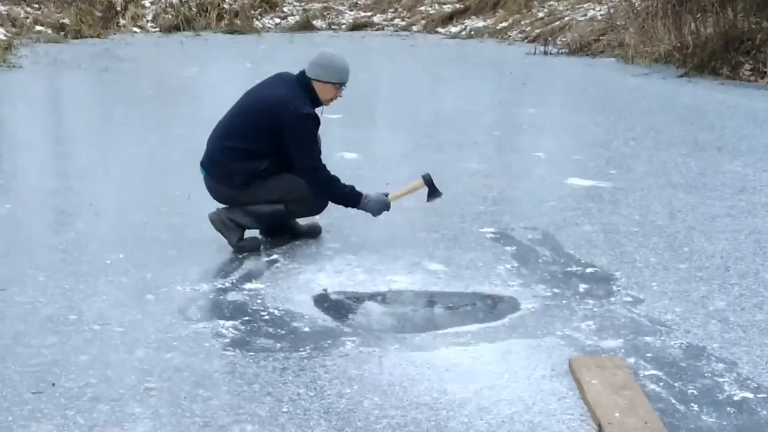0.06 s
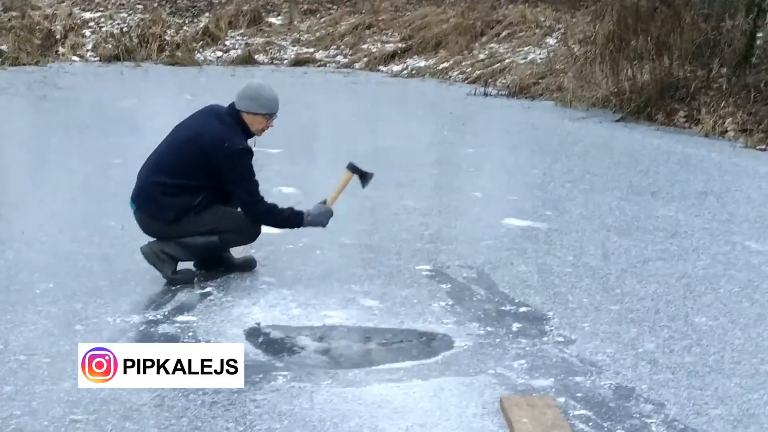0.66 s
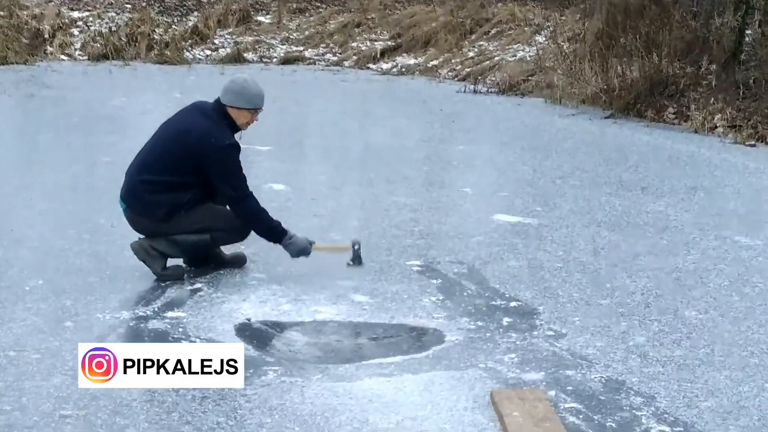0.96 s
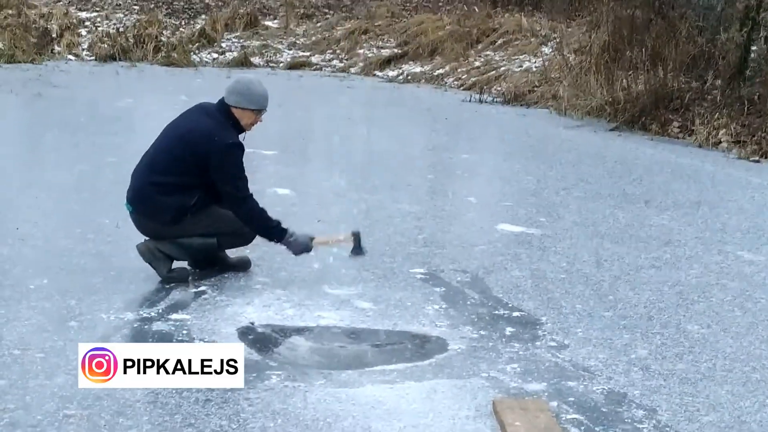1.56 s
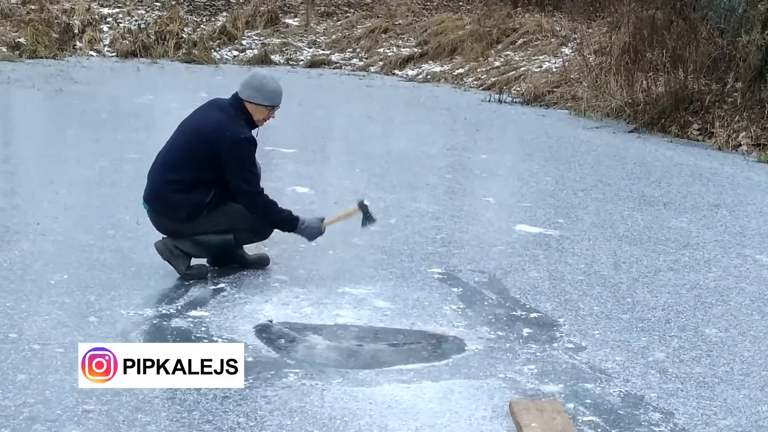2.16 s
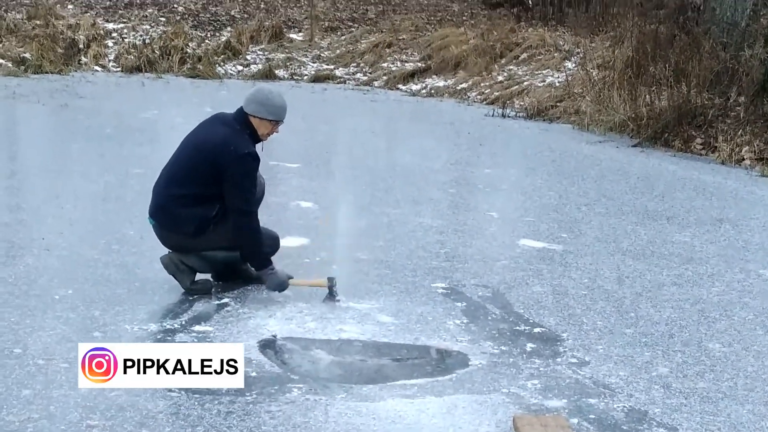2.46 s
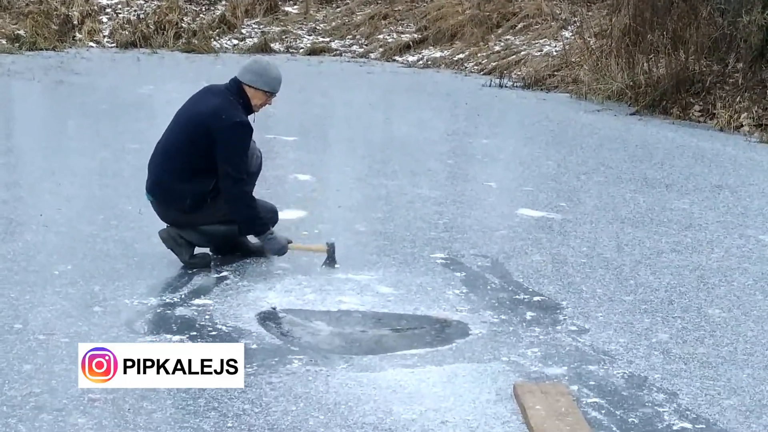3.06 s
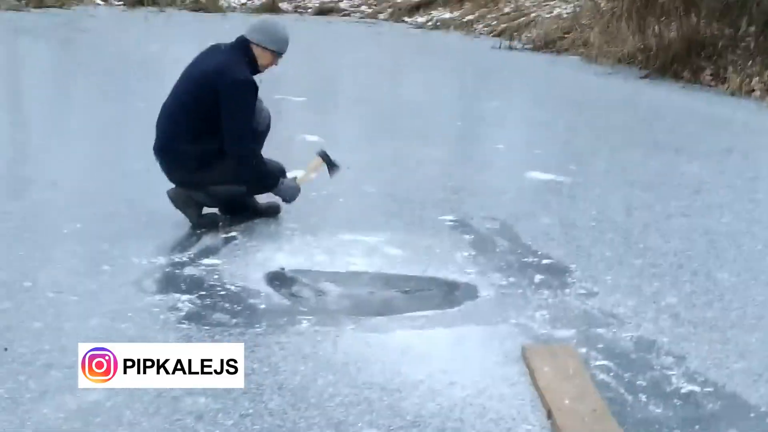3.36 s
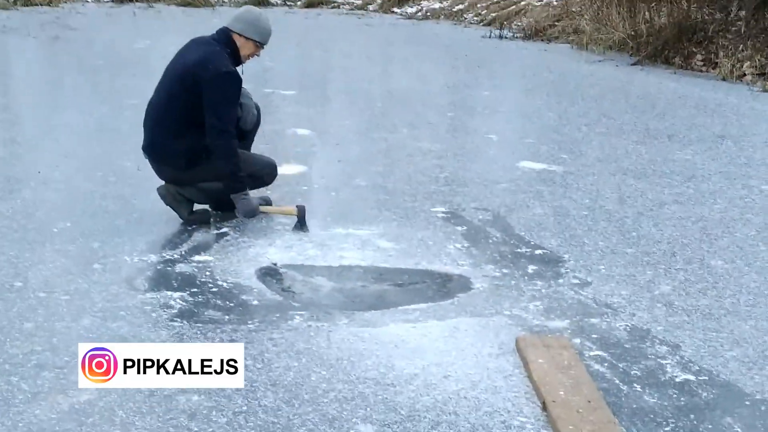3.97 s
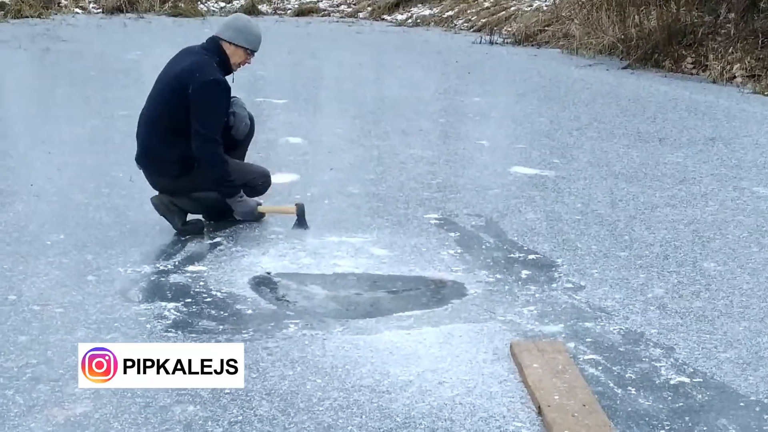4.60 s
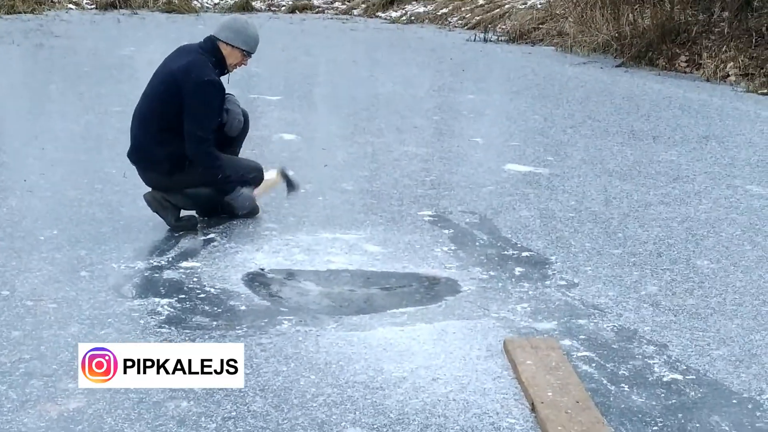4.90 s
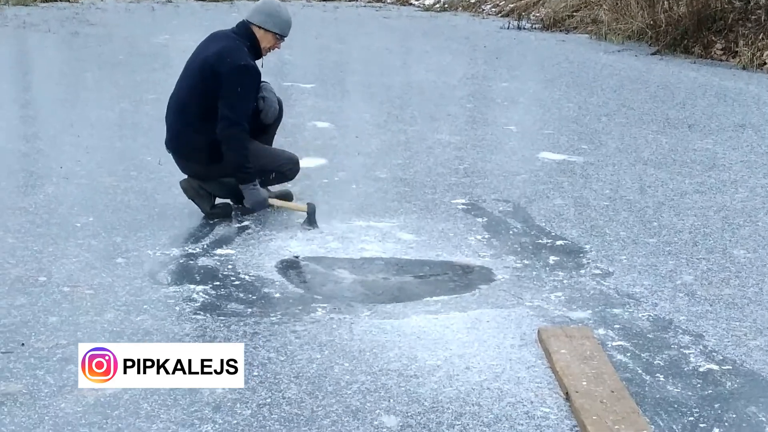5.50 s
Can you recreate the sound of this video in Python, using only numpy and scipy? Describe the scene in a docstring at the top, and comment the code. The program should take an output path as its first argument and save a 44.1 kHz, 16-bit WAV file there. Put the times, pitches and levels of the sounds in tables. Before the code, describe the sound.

Steady hatchet blows crack and crunch into a frozen pond, with quick chirps through the ice, pattering splinters and a light breeze.

```python
"""On a frozen pond, a few metres away, a small hatchet chops a notch in thick ice about twice a second.
Each blow sends a falling chirp through the ice, which arrives just before the crack and thud in the air.
As the notch deepens, the thud fades and the crunch tends to last longer. Chips spray, skid and drop off
the lifted blade, and the reedy banks echo. A faint hiss leads up to the first blow, and a breeze with
a few gusts buffets the microphone over a distant hush."""
import sys
import numpy as np
from scipy import signal
from scipy.fft import rfft, irfft, next_fast_len
from scipy.io import wavfile
from scipy.ndimage import uniform_filter1d, map_coordinates

SR = 44100
rng = np.random.default_rng(int(sys.argv[2]) if len(sys.argv) > 2 else 0)


def inscribe(sig):
    """Save sig as 16-bit PCM at rate SR to the path in sys.argv[1].

    A 1-D sig is mono; a 2-D sig holds one channel per row.
    Samples are clipped to [-1, 1] before scaling.
    """
    pcm = np.round(np.clip(np.atleast_2d(sig).T, -1, 1) * 32767)
    wavfile.write(sys.argv[1], SR, pcm.astype(np.int16))


N = 248724
T = np.arange(SR // 4) / SR  # seconds within one short sound

# Hatchet blows: start_s, crack_db, crunch_s, notch_hz, notch_boost_db, hiss_boost_db, wave_db, wave_hz
BLOWS = [ (0.258, -18, 0.0011, 1550, 8.5, 12, -30.5, 744),
         (0.7968, -17, 0.0037, 1550, 6.5, 4.5, -25.5, 662),
         (1.3483, -13.5, 0.00054, 2160, 13.5, -2, -25.5, 853),
         (1.8806, -17, 0.0035, 1840, 13.5, 2.5, -28, 714), (2.3971, -17, 0.0037, 4050, 6, 2, -29, 715),
         (2.9051, -17, 0.0027, 3400, 6.5, 6, -25.5, 684), (3.406, -16.5, 0.0043, 2850, 5, -1.5, -28.5, 685),
         (3.899, -17.5, 0.0031, 1080, 13.5, -12.5, -25.5, 713),
         (4.4193, -16, 0.0047, 4090, 10, -0.5, -39.5, 674),
         (4.9214, -17.5, 0.0049, 3500, 5.5, 5.5, -31, 677), (5.427, -19.5, 0.0093, 2900, 4, -1, -33.5, 580)]


def amp(db):
    """Turn decibels into a number to multiply by."""
    return 10 ** (np.asarray(db) / 20)


def unit(x):
    """Scale a sound to an average (rms) level of 1."""
    return x / np.sqrt(np.mean(x ** 2) + 1e-20)


def burst(x):
    """Scale a short sound to the energy of 10 ms at level 1."""
    return x / np.sqrt(np.sum(x ** 2) * 100 / SR + 1e-20)


def along(points, hz):
    """Read between (pitch_hz, value) points, with octaves evenly spaced."""
    pitches, values = np.transpose(points)
    return np.interp(np.log(hz + 1), np.log(pitches), values)


def add(track, start_s, x):
    """Mix a sound into the track at the given time."""
    start = max(round(start_s * SR), 0)
    part = track[..., start:start + x.shape[-1]]
    part += x[..., :part.shape[-1]]


def filtered(x, response):
    """Multiply each frequency in a sound by response(hz)."""
    size = next_fast_len(x.shape[-1] + SR // 8)
    return irfft(rfft(x, size) * response(np.fft.rfftfreq(size, 1 / SR)), size)[..., :x.shape[-1]]


def ringing(gain_db, size=4096):
    """The ring after one sharp tap, with the tone colour gain_db(hz)."""
    cepstrum = irfft(np.log(amp(gain_db(np.fft.rfftfreq(size, 1 / SR))) + 1e-6))
    cepstrum[1:size // 2] *= 2  # folded so that nothing sounds before the tap
    cepstrum[size // 2 + 1:] = 0
    return irfft(np.exp(rfft(cepstrum)))


def diffuse(pair, colour):
    """Colour and blend two unrelated noises so they seem to come from all around."""
    # How alike left and right are: pitch_hz, likeness (1 = the same)
    likeness = [(120, 1), (400, 0.76), (1000, 0.29), (2500, 0.094), (6000, 0.055)]
    turn = lambda hz: np.arccos(np.clip(along(likeness, hz), -1, 1)) / 2
    mid, side = filtered(pair, lambda hz: amp(along(colour, hz)) * [np.cos(turn(hz)), np.sin(turn(hz))])
    return np.array([mid + side, mid - side])


def wobble(rate):
    """A smooth curve through `rate` random points a second."""
    return map_coordinates(rng.standard_normal(int(N * rate / SR) + 4), [np.arange(N) * rate / SR])


def from_notch(x):
    """Sound straight from the notch reaches left and right with different timing and level."""
    # How far the left side leads: pitch_hz, lead_radians
    lead = [(150, 0.5), (350, -0.21), (650, -0.86), (900, -0.65), (1300, -0.6), (2800, -1.02), (5500, -1.7),
            (8500, -1.76), (13000, -2)]
    # How much louder the left side is: pitch_hz, level_db
    lean = [(300, 0), (700, .7), (1500, -1), (4500, -2.5), (8000, -1.5), (13000, 1.5)]
    side = lambda hz, share: amp(share * along(lean, hz)) * np.exp(1j * share * along(lead, hz))
    return filtered(x, lambda hz: [side(hz, .5), side(hz, -.5)])


def hush_and_breeze(hush_db=-58, lean_db=3, flutter_db=5.0):
    """A far, steady hush, and wind that buffets each side of the microphone on its own."""
    # Tone colour of the hush: pitch_hz, level_db
    hush_colour = [(60, -21.5), (120, -4), (260, 0.5), (480, -3.5), (790, 2), (1020, 0.5), (1300, -10),
                   (1700, -14.5), (2600, -16.5), (6000, -18.5), (12000, -19), (14000, -17), (15800, -32.5)]
    # Tone colour of the wind: pitch_hz, level_db
    wind_colour = [(10, -10), (25, 8.5), (50, 1), (80, -7.5), (140, -16), (300, -37), (700, -65)]
    # Rise and fall of the breeze: time_s, level_db
    strength = [(0, -52), (1.0, -49), (1.4, -45.5), (2.2, -49.5), (3.3, -54.5), (4.3, -48.5), (4.8, -40),
                (5.64, -40)]
    hush = unit(diffuse(rng.standard_normal((2, N)), hush_colour)) * amp(hush_db + .6 * wobble(2))
    breeze_db = np.interp(np.arange(N) / SR, *np.transpose(strength))
    buffet = unit(filtered(rng.standard_normal((2, N)), lambda hz: amp(along(wind_colour, hz))))
    eddies = np.array([wobble(28), wobble(28)])
    breeze = unit(buffet * amp(flutter_db * eddies)) * amp(breeze_db)
    return hush + breeze * amp([[-lean_db], [lean_db]])


def thin_hiss(peak_db=-59, swell_db_per_s=5, fade_s=0.14):
    """A faint high hiss swells up to the first blow, then dies away."""
    colour = [(1000, -5), (4000, -13), (10000, -12), (15000, -15)]  # pitch_hz, level_db
    noise = unit(diffuse(rng.standard_normal((2, N)), colour))
    t = np.arange(N) / SR - BLOWS[0][0]
    return noise * amp(peak_db + np.minimum(swell_db_per_s * t, -60 * t / fade_s))


def ice_chirp(wave_db, chirp_db, lead_s, pitch_hz, drop_hz=4200, glide_s=.0016, swell_s=0.003):
    """Bending waves in the ice outrun the air, highs first, and settle on the pitch as fast as sound."""
    hz = pitch_hz * (1 + 0.0098 * rng.standard_normal()) + drop_hz * np.exp(-T / glide_s)
    tone = np.sin(2 * np.pi * (np.cumsum(hz) / SR + rng.random()))
    front = np.exp(-((T - .002) / .0012) ** 2)
    swell = np.exp(np.minimum((T - lead_s) / swell_s, (lead_s - T) / 0.001))
    # Flaws in the ice scatter the highs into a short rasp: pitch_hz, level_db
    colour = [(300, -3.5), (2000, 4.0), (4000, -2), (7000, -8), (15000, -18.0)]
    rasp = filtered(rng.standard_normal(len(T)), lambda f: amp(along(colour, f)))
    rasp *= np.minimum(T / .001, 1) * np.exp(-T / 0.0044)
    chirp = 0.14 * burst(tone * front) + amp(-3) * burst(rasp)
    return amp(wave_db) * burst(tone * swell) + amp(chirp_db) * chirp


def crunch(length_s, onset=0.55, release_s=0.0013, grain_db=3):
    """The ice gives way in a run of tiny breaks while the blade sinks in."""
    grains = amp(grain_db * unit(uniform_filter1d(rng.standard_normal(len(T)), size=20)))
    bite = np.minimum(T / length_s + onset, 1) * np.exp(-np.maximum(T - 1.1 * length_s, 0) / release_s)
    return burst(rng.standard_normal(len(T)) * grains * bite)


def ice_hum(level_db=-34, pitch_hz=660, spread_hz=110, fade_s=.17, low_db=-2):
    """Waves scattered in the ice sheet keep a hollow note going under the crack."""
    # The deeper part of the hum: pitch_hz, level_db
    colour = [(60, -18.0), (150, -2), (280, 4.5), (380, 1), (520, 2), (1000, -36.5), (3000, -56.5)]
    noise = rng.standard_normal((2, len(T)))
    note = unit(filtered(noise[0], lambda hz: 1 / (1 + 1j * (hz - pitch_hz) / spread_hz) ** 2))
    low = unit(filtered(noise[1], lambda hz: amp(along(colour, hz))))
    return amp(level_db) * burst((note + amp(low_db) * low) * amp(-60 * T / fade_s))


def spray(gain_db=-13, fade_s=0.051, grain_db=3):
    """Splinters fly off to all sides just after the break."""
    grains = amp(grain_db * unit(uniform_filter1d(rng.standard_normal(len(T)), size=30)))
    fade = (1 - np.exp(-(T / 0.013) ** 2)) * amp(-60 * T / fade_s)
    noise = diffuse(rng.standard_normal((2, len(T))), [(1000, -1.2), (4000, -1.5), (15000, -1.5)])
    return amp(gain_db) * np.sqrt(2) * burst(noise * grains * fade)


def bank_echo(rise_s=0.025, clump_db=2.5):
    """Reeds and trees round the pond scatter a thin echo that returns in clumps."""
    # Time the echo takes to fall by 60 dB: pitch_hz, fade_s
    fade_times = [(150, 0.96), (700, 0.93), (2000, 0.82), (4000, 0.59), (8000, 0.51), (15000, 0.47)]
    # Tone colour of the echo: pitch_hz, level_db
    colour = [(100, -6), (400, 7.5), (700, 1), (1200, -6), (3000, -0.5), (8000, 1), (15000, 0)]
    hz, t, bands = signal.stft(rng.standard_normal((2, SR * 3 // 4)), SR, nperseg=256)
    fade = amp(-60 * t / along(fade_times, hz)[:, None]) * (1 - np.exp(-(t / rise_s) ** 2))
    clumps = amp(clump_db * unit(uniform_filter1d(rng.standard_normal(bands.shape[1:]), 24, axis=0)))
    tail = diffuse(signal.istft(bands * fade * clumps, SR, nperseg=256)[1], colour)
    return tail / np.linalg.norm(tail[0])


def chopping(lead_s=.0095, thud_delay_s=.001, echo_db=-18, ring_share=0.47, crack_share=0.32):
    """Each blow: first the chirp through the ice, then crack, thud and spray, then the echo."""
    # Tone colour of the crack: pitch_hz, level_db
    crack_colour = [(300, -26.5), (800, -7), (1150, -11), (2000, -7.5), (4000, -5), (8000, -1.5),
                    (11000, -6), (15000, -6.5), (16000, -10.5)]
    # Tone colour of the thud: pitch_hz, level_db
    thud_colour = [(30, -21), (70, -13), (130, -2.5), (290, -2), (400, -8.5), (520, -4), (750, -4.5),
                   (1050, -7), (1600, -29.5), (4000, -39.5)]
    # Pitches at which hatchet and ice ring: pitch_hz, half_width_hz, boost_db
    ring_tones = [(1503, 130, 7), (2400, 300, 5), (2933, 96, 2), (3440, 270, 10.5), (3930, 110, 4.5),
                  (4456, 140, 8.5), (5630, 190, 8), (6450, 320, 6), (7400, 240, 4), (10020, 460, 4.5),
                  (13400, 350, 2.5)]
    out = np.zeros((2, N))
    thud = burst(ringing(lambda hz: along(thud_colour, hz)))
    for start_s, crack_db, crunch_s, notch_hz, notch_db, hiss_db, wave_db, wave_hz in BLOWS:
        # As the notch deepens into crushed ice, the thud weakens and the crack brightens.
        thud_db = -22.5 - 1.67 * start_s
        tilt_db_per_octave = -4 + 0.54 * start_s
        chirp_db = crack_db - 22 - 2 * np.log2(crunch_s / 0.0027)  # a short, clean bite chirps louder
        shift = 1 + 0.014 * rng.standard_normal()  # grip and cut vary a little each time
        broad = lambda hz: along(crack_colour, hz) + tilt_db_per_octave * np.log2(hz / 4000 + 0.043)
        rings = lambda hz: sum(db / (1 + ((hz - f * shift) / width) ** 2) for f, width, db in ring_tones)
        notch = lambda hz: notch_db * np.exp(-(np.log2((hz + 1) / notch_hz) / 0.27) ** 2)
        hiss = lambda hz: hiss_db * np.exp(-((hz - 13000) / 4800) ** 2)
        tap = ringing(lambda hz: broad(hz) + rings(hz) + notch(hz) + hiss(hz))
        crack = burst(signal.fftconvolve(crunch(crunch_s), tap))
        direct = amp(crack_db) * crack
        add(direct, thud_delay_s, -amp(thud_db) * thud)
        add(direct, thud_delay_s, ice_hum())
        add(out, start_s - lead_s, from_notch(ice_chirp(wave_db, chirp_db, lead_s, wave_hz)))
        add(out, start_s, from_notch(direct))
        # Sound sent all around rings less and lacks the narrow beam of splinter hiss.
        around = burst(ringing(lambda hz: broad(hz) + ring_share * (rings(hz) + notch(hz))))[None]
        splinters = signal.fftconvolve(spray(), around / np.linalg.norm(around), axes=1)
        add(out, start_s, amp(crack_db) * splinters)
        for source, share in ((crack[None], crack_share), (around, 1 - crack_share)):
            echo = signal.fftconvolve(bank_echo(), source, axes=1)
            add(out, start_s, amp(crack_db + echo_db) * np.sqrt(share) * echo)
    return out


def tick(pitch_hz, fade_s=0.0091, octaves=1.45):
    """One chip touches the ice with a tiny click."""
    ring = ringing(lambda hz: np.maximum(-6 * (np.log2((hz + 1) / pitch_hz) / octaves) ** 2, -40), 512)
    t = T[:SR // 40]
    click = signal.fftconvolve(rng.standard_normal(len(t)) * amp(-60 * t / fade_s), ring)
    return click / np.abs(click).max()


def chips(crumb_db=-29, crumbs_per_blow=32, skid_db=-7, skid_fade_s=0.16):
    """Chips click on the ice and skid; crumbs patter down after every blow."""
    # Larger chips landing: start_s, peak_db, pitch_hz
    landings = [(1.1404, -35.5, 8400), (1.4752, -28, 5760), (1.5762, -31.5, 8000), (1.77, -30, 7000),
                (1.806, -25.5, 8000), (2.3258, -37.5, 12000), (2.5458, -17, 7200), (2.6066, -19.5, 7600),
                (2.6837, -34, 10000), (3.728, -31, 11500), (4.2315, -31, 9450), (5.5198, -21.5, 12100)]
    out = bits_off_blade()
    for start_s, peak_db, pitch_hz in landings:
        add(out, start_s, amp(peak_db) * tick(pitch_hz))
    for start_s, crack_db, *_ in BLOWS:
        for flight, size, pitch in rng.random((crumbs_per_blow, 3)):
            landing_s = start_s + .04 + .4 * flight ** 2  # most crumbs fall close by
            peak_db = crack_db + crumb_db + 8 * size ** 2 - 10 * flight
            add(out, landing_s, amp(peak_db) * tick(5000 + 8000 * pitch))
    skid = rng.standard_normal((2, len(T))) * amp(-60 * T / skid_fade_s)
    skids = signal.fftconvolve(out[None], skid / np.linalg.norm(skid[0]), axes=1)[:, :N]
    return from_notch(out) + amp(skid_db) * skids


def bits_off_blade(count=3, delay_s=0.28, lift_s=0.2, loudest_db=-38.5, spread_db=6, middle_hz=9400):
    """From the second blow on, broken ice clings to the blade and drops as it is lifted."""
    out = np.zeros(N)
    for start_s, *_ in BLOWS[1:]:
        for when, size, pitch in rng.random((count, 3)):
            click = amp(loudest_db - spread_db * (1 - size)) * tick(middle_hz * 2 ** ((pitch - .5) / 2))
            add(out, start_s + delay_s + lift_s * when, click)
    return out


def gusts(half_length_s=0.028, lean_db=4.0):
    """Short gusts thump the microphone, mostly on the right, higher in pitch than the breeze."""
    # Puffs of wind: peak_s, level_db
    puffs = [(1.23, -50.5), (1.46, -39.5), (4.54, -35.5), (5.231, -33.5), (5.33, -32)]
    # Their tone colour: pitch_hz, level_db
    colour = [(12, -20.5), (35, 1), (60, 3.5), (120, -7), (250, -22.5), (600, -50.5), (1500, -90)]
    t = np.arange(N) / SR
    swell = sum(amp(db) * np.exp(-((t - peak_s) / half_length_s) ** 2) for peak_s, db in puffs)
    eddies = unit(filtered(rng.standard_normal((2, N)), lambda hz: amp(along(colour, hz))))
    return eddies * swell * amp([[-lean_db], [lean_db]])


def scene():
    """All the sounds of the pond together."""
    return chopping() + chips() + thin_hiss() + hush_and_breeze() + gusts()


def record(dry):
    """Round off the loudest peaks and cut the very highest pitches."""
    top_hz = 16150
    rounded = dry / (1 + np.abs(dry) ** 6) ** (1 / 6)
    return filtered(rounded, lambda hz: 1 / np.sqrt(1 + (hz / top_hz) ** 160))


dry = scene()
out = record(dry)
inscribe(out)
```